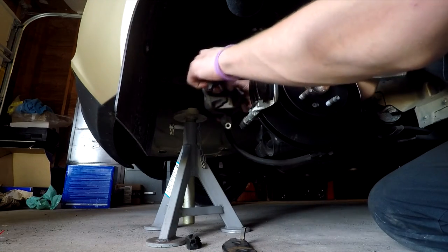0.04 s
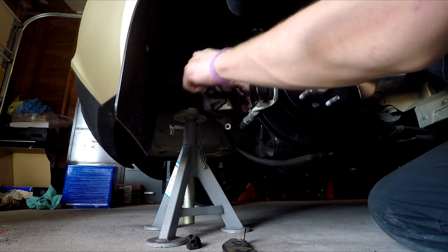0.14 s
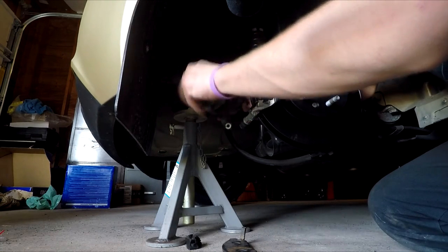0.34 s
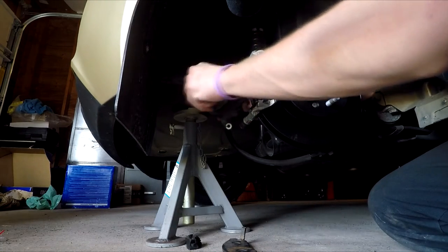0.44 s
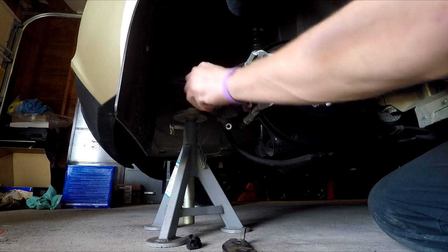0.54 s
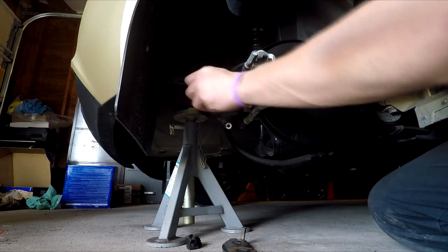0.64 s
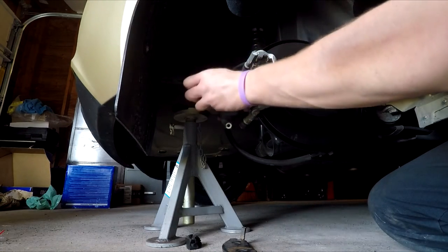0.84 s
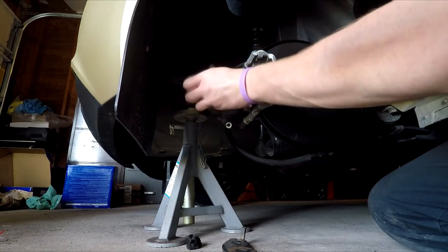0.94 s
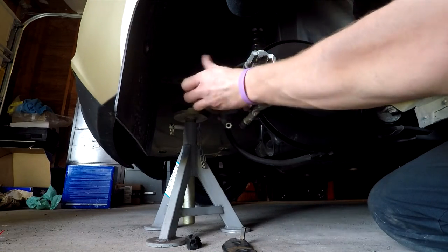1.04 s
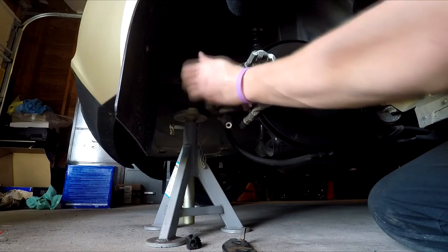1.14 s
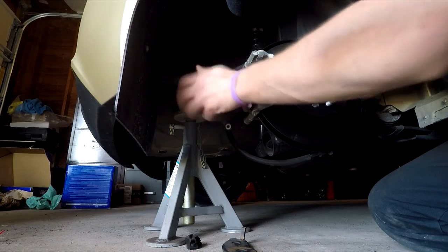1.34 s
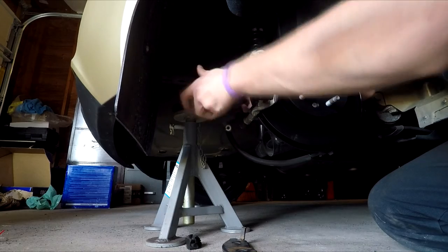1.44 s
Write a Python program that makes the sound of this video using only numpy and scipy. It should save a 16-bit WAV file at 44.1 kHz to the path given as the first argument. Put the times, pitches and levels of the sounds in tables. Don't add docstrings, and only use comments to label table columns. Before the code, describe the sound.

Brake caliper clinks and knocks sharply in bursts as hands shift it in a quiet garage

```python
import sys
import numpy as np
from scipy import signal
from scipy.fft import rfft, irfft, next_fast_len
from scipy.io import wavfile
from scipy.ndimage import uniform_filter1d

SR = 44100
rng = np.random.default_rng(int(sys.argv[2]) if len(sys.argv) > 2 else 0)


def makeup_ratio(level_db):
    decades = np.asarray(level_db, float) / 20
    return 10 ** decades


def master(y):
    cut = np.clip(np.atleast_2d(y).T, -1, 1)
    pcm = np.round(cut * 32767)
    wavfile.write(sys.argv[1], SR, pcm.astype(np.int16))


N = 66150
MUTE_S = 0.0028

# frequency in Hz, density in dB per Hz.
ROOM_SPECTRUM = [(12, -32.5), (20, -4.5), (177, -5), (319, -8.5), (388, -9.5), (718, -17), (1120, -18),
                 (14700, -27.5), (16000, -24.5)]
# frequency in Hz, level in dB.
HUM_TONES = [(139, -85), (204, -90.5)]
# time in s, level in dB.
RUB_LEVEL = [
    (1.26, -81),
    (1.32, -54.5),
    (1.36, -59),
    (1.42, -58.5),
    (1.45, -56.5),
    (1.5, -55.5),
]
# frequency in Hz, density in dB per Hz.
RUB_SPECTRUM = [(250, -17.5), (900, -6), (1700, -6.5), (3000, -2), (6200, 2.5), (7600, -1), (8800, -14),
                (14000, -28)]
# time in s, level in dB.
CREEP_LEVEL = [
    (0, -68.5),
    (.1, -80),
    (.15, -53.5),
    (.2, -73),
    (.34, -86),
    (.4, -79),
    (.45, -64.5),
    (.49, -74.5),
    (.52, -94.5),
]
# start in s, level
# in dB, frequency in Hz, T60 in s.
TAP_NOTES = [(0.1575, -42, 855, 0.0063), (.171, -31.5, 5380, .012), (0.2104, -36, 543, .008),
             (0.153, -47, 5340, 0.015), (0.2455, -25.5, 3085, 0.027), (.248, -30, 6500, .015),
             (.2435, -32, 906, 0.011), (.256, -38, 1050, 0.0097), (0.3048, -33, 1220, 0.013),
             (0.3049, -26, 3440, 0.017), (0.3213, -26, 3120, 0.031), (0.32, -35.5, 2010, 0.011),
             (0.3174, -31.5, 474, 0.005), (0.335, -37.5, 1210, 0.027), (.341, -32.5, 3200, 0.0073),
             (.355, -46, 1940, 0.035), (.445, -54.5, 2054, 0.1), (0.614, -59, 3503, .015),
             (.7955, -49, 800, 0.022), (.799, -27, 3604, 0.017), (.799, -31, 4840, 0.011),
             (.7995, -37.5, 2274, 0.014), (0.8023, -36.5, 4340, 0.0048), (.8375, -31, 3570, 0.0099),
             (0.8404, -42, 5070, 0.008), (.964, -43, 3650, .008), (0.97, -46.5, 3300, .004),
             (0.9482, -58.5, 3100, 0.36), (0.9698, -40.5, 900, .006), (0.976, -45, 4500, 0.0079),
             (1.189, -46.5, 3380, 0.024), (1.2059, -40, 3650, 0.0092), (1.2119, -40, 5270, 0.014),
             (1.2266, -32, 1260, 0.015), (1.2276, -46.5, 620, 0.022), (1.2278, -20.5, 2487, 0.021),
             (1.2305, -21, 3820, 0.016), (1.234, -23.5, 2870, 0.015), (1.244, -41.5, 3123, 0.15),
             (1.2325, -21, 6527, 0.032), (1.2405, -37, 6500, 0.022), (1.279, -46, 2060, 0.011),
             (1.25, -46, 2850, .1), (.249, -35, 3190, 0.05), (1.23, -27, 4960, 0.0093)]
# start in s, level in dB, frequency in Hz, T60 in s.
CASTING_THUDS = [
    (0.242, -48, 222, 0.11),
    (.318, -48, 408, 0.025),
    (0.802, -55, 527, 0.13),
    (.895, -56, 371, 0.042),
    (.99, -54.5, 585, .05),
    (1.012, -54, 576, 0.094),
    (1.237, -46.5, 544, 0.058),
    (1.248, -52, 211.5, 0.19),
    (1.307, -65, 59.3, 0.066),
    (1.312, -48.5, 567, 0.016),
]
# frequency in Hz, level in dB, T60 in s.
SPRING_MODES = [(10920, -2, 0.12), (13130, -5, 0.1), (10050, -2, 0.025), (11400, -4, 0.025)]
# start in s, level in dB, upper-mode tilt in dB, time held in s.
SPRING_PINGS = [
    (0.167, -52, -3, 0.037),
    (0.2097, -22, -24, 0.11),
    (0.318, -52, 1, 0.013),
    (0.9465, -62, 17, .05),
    (1.012, -64, -4, 0.026),
    (1.228, -46.5, -2, 0.049),
]
# time in s, level in dB.
SCRAPE_LEVEL = [(0, -71.5), (.14, -62.5), (.2, -52), (.29, -62), (.35, -44.5), (.4, -73), (.475, -59),
                (.5, -88), (.942, -86), (.947, -63.5), (.968, -52.5), (1.03, -60.5), (1.09, -76.5),
                (1.12, -57), (1.151, -69.5), (1.157, -56), (1.22, -48), (1.3, -61.5)]
# time in s, level in dB.
DRAG_LEVEL = [(.78, -89), (.8, -61.5), (.87, -74.5), (.95, -82), (1.0, -68.5), (1.05, -71.5), (1.105, -94),
              (1.115, -59), (1.148, -65.5), (1.17, -60.5), (1.26, -61), (1.33, -64), (1.37, -87),
              (1.42, -74), (1.45, -58), (1.48, -92)]
# frequency in Hz, level in dB, T60 in s.
SLIDE_MODES = [(2196, 2, .12), (3126, -1.5, 0.059), (6790, -2, 0.42), (6200, -4, 0.056)]
# centre in Hz, width in octaves, level in dB.
GRIT_BANDS = [(880, 5.1, -3), (3200, 1.9, 1.5), (11200, 2, -5.5)]
# frequency in Hz, level in dB, T60 in s.
BODY_MODES = [(1210, 1, 0.0056), (2040, -23.5, 0.14), (2400, -7, 0.027), (2570, -6.5, 0.033),
              (3020, -15, 0.018), (3120, -4, .06), (3374, 3, 0.021), (3685, -3.5, 0.033),
              (4470, -12.5, 0.05), (5010, 1.5, .022), (5620, -5.5, 0.084), (800, -13, .03),
              (4860, -14.5, .022)]
# frequency in Hz, level in dB, T60 in s.
CLIP_MODES = [(6234, 1.5, 0.05), (6500, 11, 0.031), (6500, 2, .1), (7100, -6, .05)]
# start in s, crack level in dB, crack centre in Hz, clip level in dB, ring held in s.
BRUSH_EVENTS = [
    (.468, -55.5, 6100, -46.5, 0.009),
    (.603, -53.5, 6090, -63.5, 0.036),
    (.613, -54, 4640, -56.5, 0.022),
    (1.053, -56, 8000, -65, 0.0095),
    (1.128, -57, 9000, -62, 0.0075),
]
# start in s, crack level in dB, crack centre in Hz, clip level in dB, ring held in s.
TICK_EVENTS = [(.2105, -17.5, 1229, -40, 0.014), (.73, -64, 1180, -76, .01), (.7955, -47, 986, -36, 0.0052),
               (.7995, -26, 3940, -41.5, 0.031), (.8125, -34, 3450, -42, 0.013),
               (.8375, -34, 3130, -42, 0.028), (.897, -50.5, 3400, -58, 0.011),
               (.9455, -53, 1790, -55, 0.035), (.9705, -44.5, 3040, -49.5, .02),
               (.999, -46.5, 1160, -75, .02), (1.014, -51.5, 1440, -54.5, 0.0408),
               (1.1105, -53.5, 1530, -69, 0.032), (1.1545, -49.5, 1180, -52.5, 0.074),
               (1.19, -47, 3350, -65, 0.013), (1.495, -50.5, 1250, -51, .02)]
# start in s, crack level in dB, crack centre in Hz, clip level in dB, ring held in s.
KNOCK_EVENTS = [(.157, -34.5, 2400, -40.5, 0.0077), (.168, -29.5, 3560, -35, 0.035),
                (.2105, -9.5, 3470, -10.5, 0.0082), (.2145, -8.5, 5100, -11.5, 0.01),
                (.2305, -25.5, 3200, -17.5, 0.017), (.2435, -21, 2100, -25, 0.011),
                (.2565, -24, 2920, -30.5, 0.086), (.3005, -31.5, 2900, -58, .004),
                (.3055, -27.5, 2850, -20.5, 0.013), (.317, -19.5, 3340, -16.5, 0.0038),
                (.3222, -26, 4200, -20.5, 0.0033), (.329, -37, 2400, -26, 0.016),
                (.345, -55, 3000, -36, 0.045), (.338, -32.5, 2450, -47, 0.042),
                (1.218, -50, 5500, -40, .004), (1.2262, -17, 3200, -55, 0.0021),
                (1.2285, -29.5, 4800, -25.5, 0.009), (1.2385, -28, 2870, -30.5, 0.028),
                (1.262, -64, 3070, -52, 0.05)]


def unit(x):
    return x / np.sqrt(np.mean(x ** 2))


def peak(x):
    return x / np.abs(x).max()


def add_at(out, start_s, x):
    i = int(start_s * SR)
    out[i:i + len(x)] += x


def butter(x, order, hz, kind="low"):
    return signal.sosfilt(signal.butter(order, hz, kind, fs=SR, output="sos"), x)


def shade(x, gain):
    n = next_fast_len(len(x) + 512)
    hz = np.arange(n // 2 + 1) * SR / n + 1
    return irfft(rfft(x, n) * gain(hz), n)[:len(x)]


def band(x, hz, octaves):
    w = 2 * np.pi * hz / SR
    a = np.sin(w) * np.sinh(np.log(2) / 2 * octaves)
    return signal.lfilter([a, 0, -a], [1 + a, -2 * np.cos(w), 1 - a], x)


def band2(x, hz, octaves):
    return band(band(x, hz, octaves), hz, octaves)


def ring(x, modes, tweak):
    rough_rate_hz, rough_share, scatter_db = 150, .75, 2.5
    out, k = 0, int(SR / rough_rate_hz)
    for (hz, db, t60_s), (level, pitch) in zip(modes, tweak):
        decay = np.log(1000) / (max(t60_s, .005) * SR)
        pole = np.exp(2j * np.pi * hz * (1 + 0.01 * pitch) / SR - decay)
        knots = rng.standard_normal((2, len(x) // k + 2))
        waver = [np.interp(np.arange(len(x)) / k, np.arange(knots.shape[1]), row) for row in knots]
        z = signal.lfilter([1], [1, -pole], x)
        z = z * (1 + rough_share * (waver[0] + 1j * waver[1]))
        out = out + makeup_ratio(db + scatter_db * level) * z.imag
    return out


def curve(table, end_db):
    s, db = np.array(table).T
    return makeup_ratio(np.interp(np.arange(N) / SR, s, db, left=db[0], right=end_db))


def coloured(table):
    hz, db = np.array(table).T
    return unit(shade(rng.standard_normal(N), lambda f: makeup_ratio(np.interp(np.log(f), np.log(hz), db))))


def flicker(rate_hz, db):
    k = int(SR / rate_hz)
    steps = np.repeat(rng.standard_normal(N // k + 1), k)
    return makeup_ratio(db * uniform_filter1d(steps, k)[:N])


def room_tone():
    t = np.arange(N) / SR
    hum = 0
    for hz, db in HUM_TONES:
        hum = hum + makeup_ratio(db) * np.sqrt(2) * np.sin(2 * np.pi * hz * t) * flicker(20.0, 5.0)
    start_db, start_s = 11.5, .2
    air = makeup_ratio(-68.5) * coloured(ROOM_SPECTRUM) * flicker(3.1, 0.92)
    return air + hum * makeup_ratio(start_db * (t < start_s))


def garage(x):
    t60_s, level_db, top_hz = 0.47, -23, 7200
    t = np.arange(SR // 2) / SR
    tail = rng.standard_normal(len(t)) * np.exp(-np.log(1000) * t / t60_s) * np.minimum(t / 0.0015, 1)
    tail = shade(tail, lambda f: 1 / (1 + (f / top_hz) ** 2))
    return makeup_ratio(level_db) * signal.fftconvolve(x, tail / np.sqrt(np.sum(tail ** 2)))[:N]


def rub():
    onset = [(RUB_LEVEL[0][0] - .05, -110)]
    return coloured(RUB_SPECTRUM) * curve(onset + RUB_LEVEL, RUB_LEVEL[-1][1]) * flicker(80, 2.0)


def creep():
    x = band2(rng.standard_normal(N), 2150, .2)
    return unit(x) * curve(CREEP_LEVEL, -120) * flicker(33, 2.8)


def taps():
    out, t = np.zeros(N + 4000), np.arange(4000) / SR
    for s, db, hz, t60_s in TAP_NOTES:
        push = np.exp(-t * hz * 2)
        x = ring(push, [(hz, 0, t60_s)], np.zeros((1, 2))) * np.minimum(t / 0.00055, 1)
        add_at(out, s, makeup_ratio(db) * peak(x))
    return butter(out[:N], 2, 350, "high")


def thuds():
    out, t = np.zeros(N + 8000), np.arange(8000) / SR
    for s, db, hz, t60_s in CASTING_THUDS:
        push = np.exp(-t * hz * 2)
        modes = [(hz, 0, t60_s), (hz * 2.0, -6, t60_s / 2)]
        x = ring(push, modes, np.zeros((2, 2))) * np.minimum(t * hz, 1)
        add_at(out, s, makeup_ratio(db) * peak(x))
    return out[:N]


def spring():
    out, t = np.zeros(N + 8000), np.arange(8000) / SR
    for s, db, tilt_db, held_s in SPRING_PINGS:
        modes = [(hz, g + tilt_db * (hz > 12500), t60_s) for hz, g, t60_s in SPRING_MODES]
        jolt = rng.standard_normal(len(t)) * np.exp(-t / .004)
        x = ring(jolt, modes, np.zeros((len(modes), 2)))
        x = x * np.exp(-np.maximum(t - held_s, 0) / (2 * MUTE_S))
        add_at(out, s, makeup_ratio(db) * peak(x))
    return out[:N]


def drag():
    x = unit(band2(rng.standard_normal(N), 820, 1.6))
    return x * flicker(90, 3.0) * curve(DRAG_LEVEL, -70)


def grit(x):
    out = 0
    for hz, octaves, db in GRIT_BANDS:
        signed = x * rng.choice([-1, 1], len(x))
        out = out + makeup_ratio(db) * band2(signed, hz, octaves) / np.sqrt(hz)
    return out


def scrape():
    rate_hz, spread_db = 7900, 5
    u = rng.random((2, N))
    clicks = (u[0] < rate_hz / SR) * np.clip(rng.standard_normal(N), -2, 2)
    clicks = unit(clicks * makeup_ratio(-spread_db * np.log(u[1] + .08)))
    clicks = clicks * flicker(46, 1.2) * curve(SCRAPE_LEVEL, SCRAPE_LEVEL[-1][1] - 6)
    still, probe = np.zeros((20, 2)), rng.standard_normal(8000)
    out = drag()
    parts = [(lambda x: ring(x, BODY_MODES, still), 0),
             (lambda x: ring(x, SLIDE_MODES, still), -4),
             (grit, 0.5),
             (lambda x: ring(x, SPRING_MODES, still), -17)]
    for part, db in parts:
        out = out + makeup_ratio(db) * part(clicks) / np.std(part(probe)) / 2
    return out


def knocks(table, body_db, chatter_s, octaves, sizzle_db):
    size = 8000
    out, t = np.zeros(N + size), np.arange(size) / SR
    for s, crack_db, hz, ring_db, held_s in table:
        noise = rng.standard_normal((3, size))
        tweak = rng.standard_normal((len(BODY_MODES) + len(CLIP_MODES), 2))
        chatter = noise[0] * makeup_ratio(2.5 * noise[1])
        chatter = chatter * np.exp(-t / chatter_s) * np.minimum(t / 0.00015, 1)
        crack = band2(band(chatter, hz, octaves), hz, 2 * octaves)
        rattle = butter(band2(noise[2], hz, 6.2) * np.exp(-t / .012), 2, 7550)
        body = ring(crack, BODY_MODES, tweak)
        sizzle = band(band(chatter, 9700, 0.94), 9700, 0.93)
        hit = peak(crack) + makeup_ratio(body_db) * peak(body) + makeup_ratio(-13) * peak(rattle) + makeup_ratio(sizzle_db) * peak(sizzle)
        clip = peak(ring(chatter, CLIP_MODES, tweak[len(BODY_MODES):]))
        clip = clip * np.exp(-np.maximum(t - held_s, 0) / MUTE_S)
        add_at(out, s, makeup_ratio(crack_db) * hit + makeup_ratio(ring_db) * clip)
    return butter(out[:N], 3, [300, 14300], "band")


def scene():
    hands = knocks(KNOCK_EVENTS, body_db=-5.5, chatter_s=0.0031, octaves=1.61, sizzle_db=-33.5)
    hands = hands + knocks(TICK_EVENTS, body_db=-9, chatter_s=0.00058, octaves=0.79, sizzle_db=-20.5)
    hands = hands + thuds() + spring()
    hands = hands + knocks(BRUSH_EVENTS, body_db=-30, chatter_s=0.0093, octaves=1.0, sizzle_db=-13)
    hands = hands + scrape() + rub() + creep() + taps()
    return (hands + garage(hands) + room_tone())[None]


def band_limit(x):
    return signal.sosfilt(signal.butter(12, 16470, fs=SR, output="sos"), x)


def record(dry):
    shelf_hz, shelf_db, dip_hz, dip_share, limit, top_hz = 7200, 0.5, 8470, 0.4, .7, 15000
    treble = signal.sosfiltfilt(signal.butter(3, shelf_hz, "high", fs=SR, output="sos"), dry)
    dry = dry + (makeup_ratio(shelf_db) - 1) * treble
    dry = dry - dip_share * band(dry, dip_hz, 0.33)
    dry = np.tanh(dry / limit) * limit
    return band_limit(butter(dry, 8, top_hz))


dry = scene()
out = record(dry)
master(out)
```